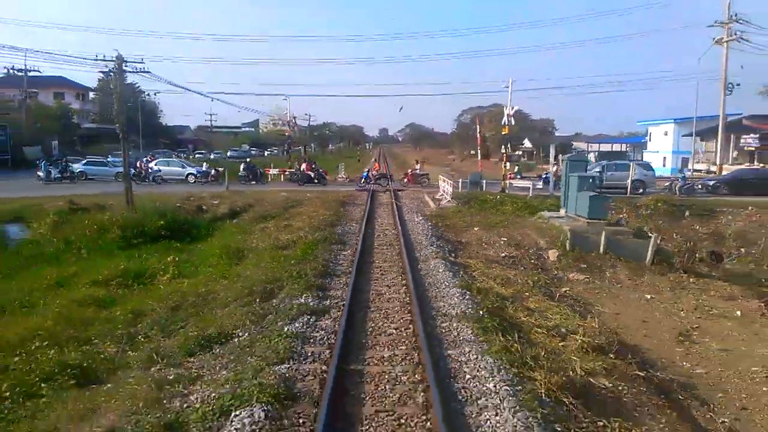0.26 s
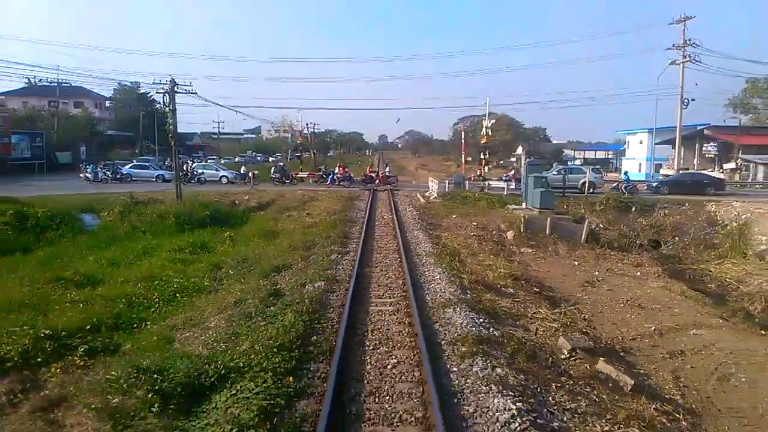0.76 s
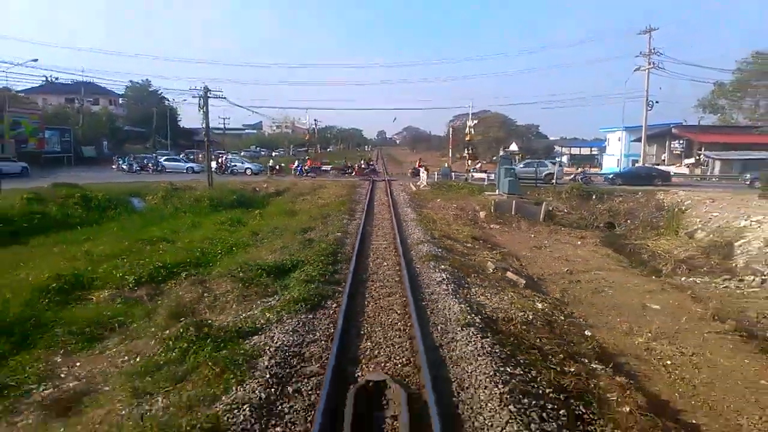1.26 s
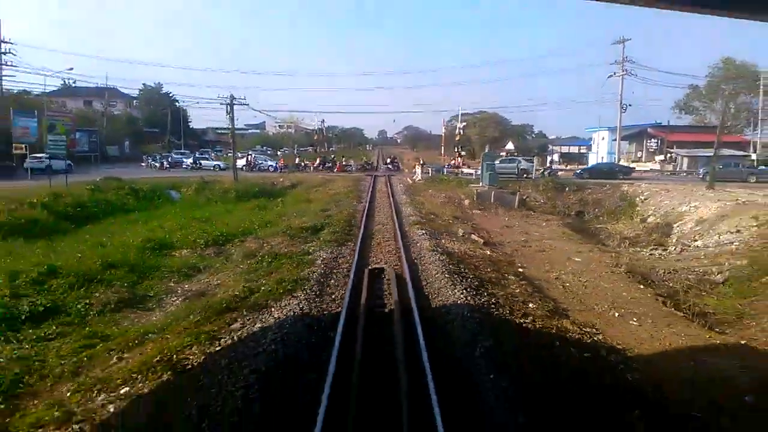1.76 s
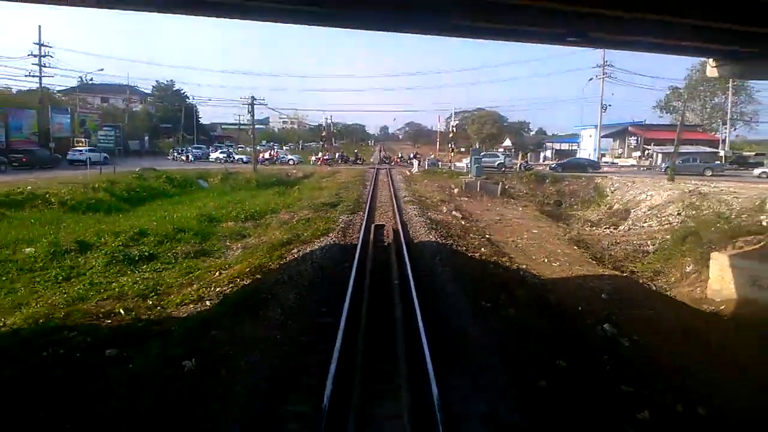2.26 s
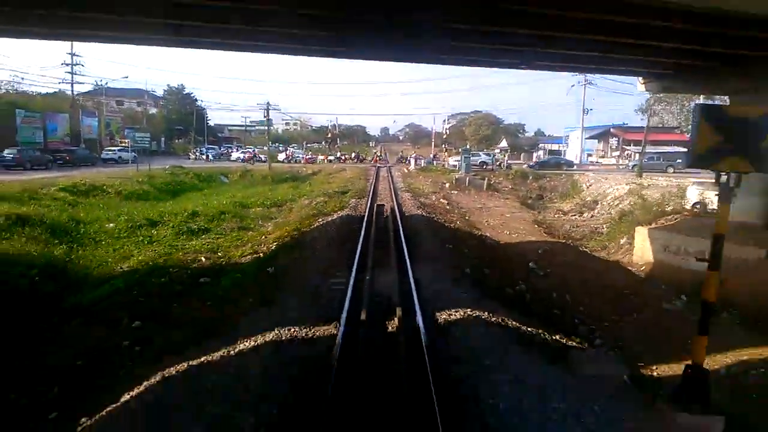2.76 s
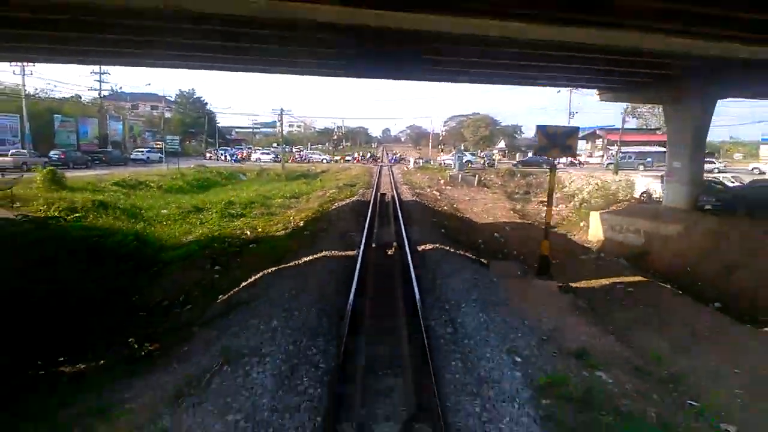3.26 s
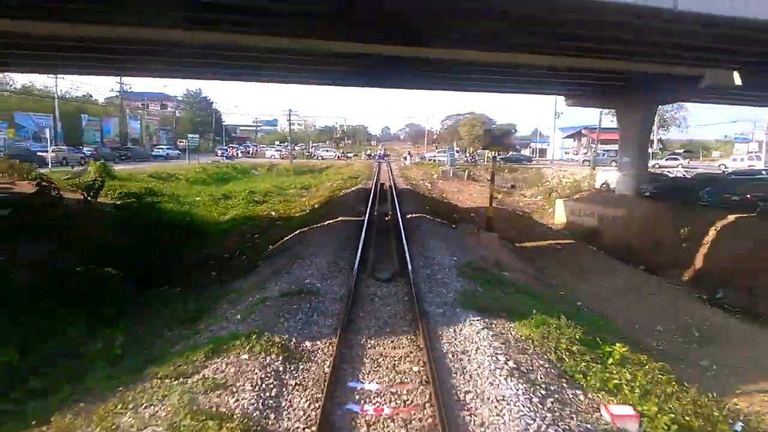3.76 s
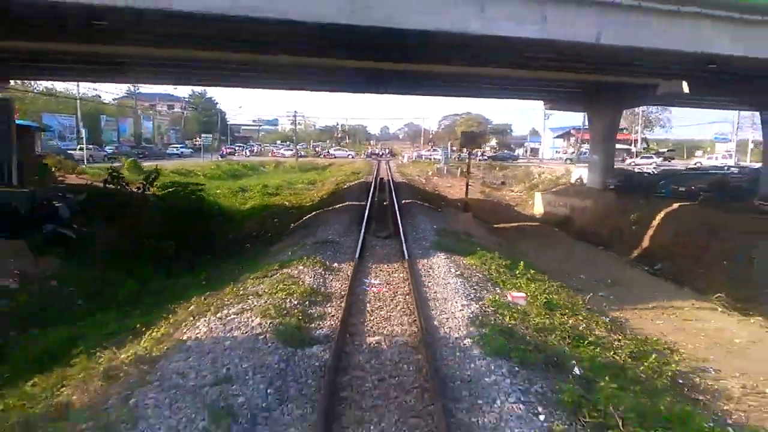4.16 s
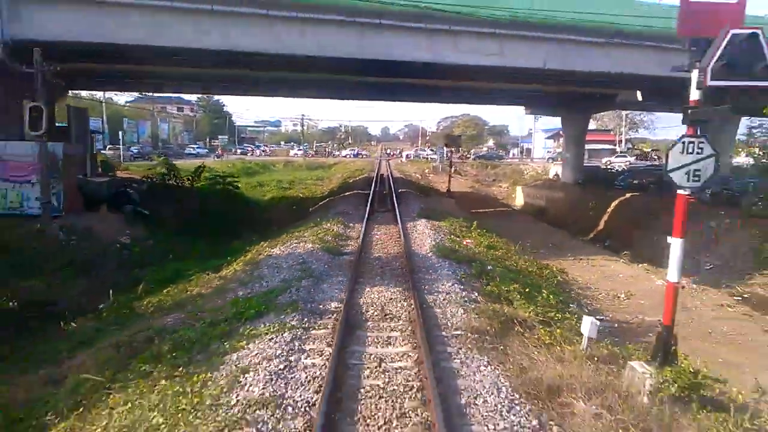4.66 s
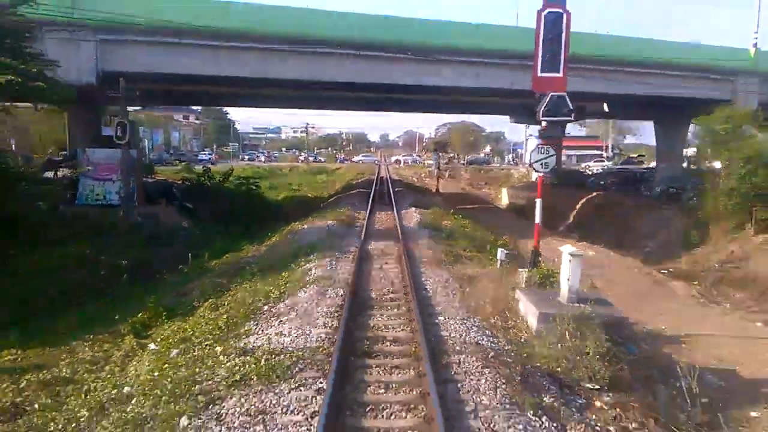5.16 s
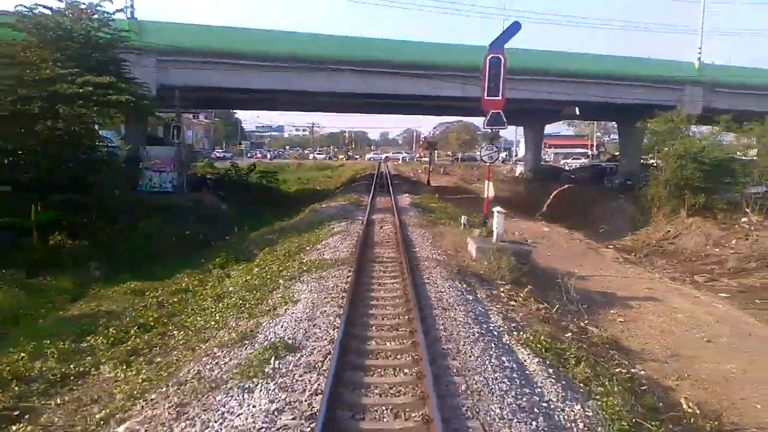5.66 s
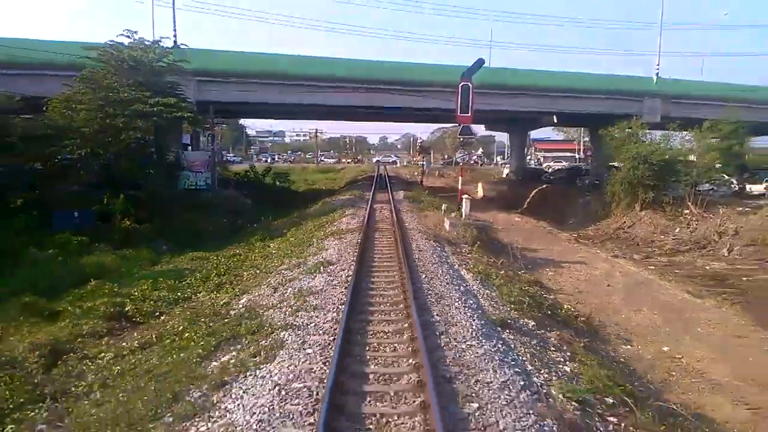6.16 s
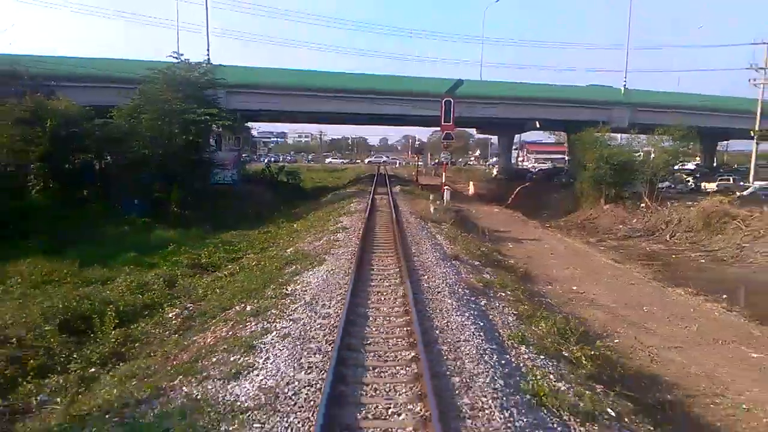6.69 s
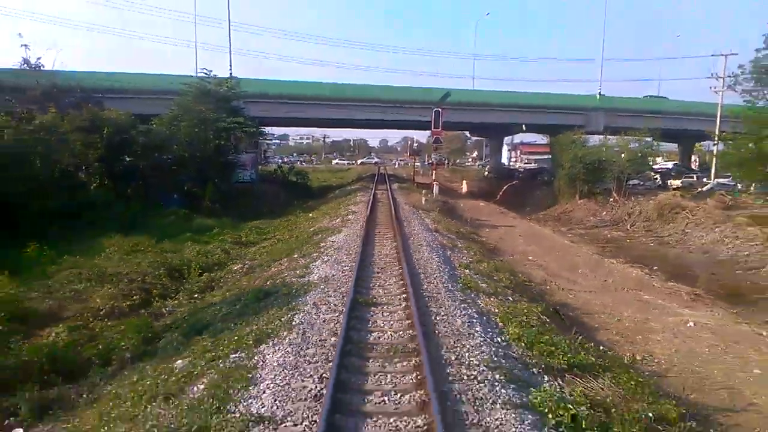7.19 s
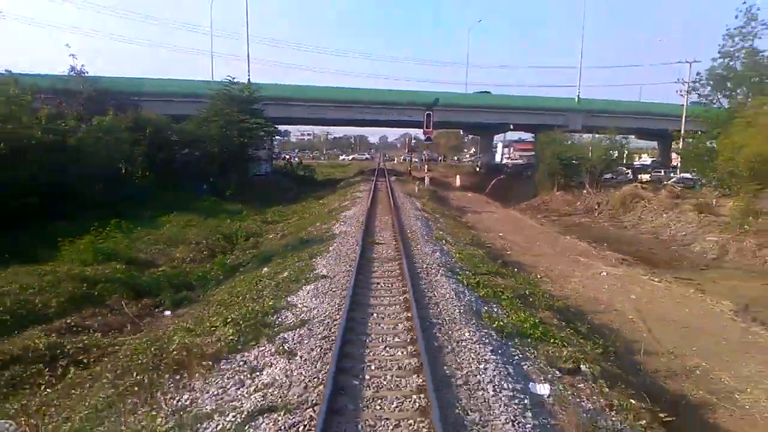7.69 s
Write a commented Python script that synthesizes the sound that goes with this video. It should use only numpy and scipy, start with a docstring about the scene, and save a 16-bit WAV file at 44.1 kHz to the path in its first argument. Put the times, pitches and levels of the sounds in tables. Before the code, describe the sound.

Heard from the open rear of a moving train: low booming floor, groans swelling with each wheel turn, brief squeaks, thuds and loose iron clatter.

```python
"""The open rear end of a passenger carriage rolling on a single track at a nearly steady, slightly rising speed.
Throughout, filtered noise makes body boom, rail rumble, wheel ring and hiss, swelling with each turn of a worn wheel;
floor groans, squeaks and cracking grit recur. Dry ticks come first, a thin squeal at 0.6 s, then scraping flanges.
Jolts shake the bogie near 1.6 and 3.9 s; loose iron clanks near 1.5, 3.5, 4 and 6 s. Panels knock and the floor
thuds from 1.3 s on, and small fittings chink from 3.4 s. Strikes are short noise bands or swinging tones."""
import sys
import numpy as np
from scipy import signal
from scipy.fft import rfft, irfft, next_fast_len
from scipy.io import wavfile
from scipy.ndimage import uniform_filter1d

SR = 44100
rng = np.random.default_rng(int(sys.argv[2]) if len(sys.argv) > 2 else 0)


def unload_audio(sound):
    """Save the sound as a 16-bit wav file, at the path given as the first command line argument."""
    columns = np.transpose(np.atleast_2d(sound))
    # keep every value between -1 and 1, then stretch to whole-number steps
    steps = np.round(np.clip(columns, -1, 1) * 32767)
    wavfile.write(sys.argv[1], SR, steps.astype(np.int16))


N = 349696
TAPS = 16384  # filter length [samples]
TIME = np.arange(N) / SR
HZ = np.maximum(np.fft.rfftfreq(TAPS, 1 / SR), 1)
TURN_HZ = 4.7474  # initial wheel turns per second

# rolling noise over rougher and smoother rail: (time [s], floor rumble [dB], panel roar [dB])
TRACK_LEVELS = [(0.0, -40, -48), (0.65, -36.5, -45.5), (0.92, -34, -44), (1.97, -32, -43.5),
                (2.2, -34, -46.5), (2.85, -35.5, -45.5), (3.0, -35.5, -47), (3.15, -38.5, -48.5),
                (3.55, -35, -48.5), (3.7, -39.5, -48.5), (3.9, -33.5, -41), (4.2, -38.5, -52),
                (4.5, -34.5, -52), (4.75, -45, -50), (6.0, -37.5, -49.5), (6.4, -42, -52),
                (7.35, -40.5, -51.5), (7.7, -36.5, -45.5)]
# steel rubbing on steel: (time [s], wheel ring [dB], scrape [dB], hiss [dB])
RUB_LEVELS = [(0.0, -53.5, -60, -63.5), (0.75, -52.5, -57.5, -62), (0.95, -54, -48, -60.5),
              (1.3, -54.5, -49, -60.5), (1.45, -53, -45.5, -60), (1.7, -54, -57, -60.5),
              (2.9, -55.5, -52, -62.5), (3.05, -55.5, -60, -63.5), (3.8, -56, -69, -62),
              (3.95, -54, -55, -62), (4.2, -54.5, -60, -64.5), (4.52, -58.5, -61, -62.5),
              (4.7, -58.5, -66.5, -67), (4.95, -55.5, -61.5, -66.5), (7.35, -56.5, -63.5, -66.5),
              (7.93, -52.5, -63, -64)]


def undb(db):
    """Decibels to gain."""
    return 10 ** (np.asarray(db) / 20)


def pan(db):
    """Gains of the two channels for a left minus right level."""
    return undb(np.array([[db], [-db]]) / 2)


def curves(table):
    """Each column of a table, joined by straight lines in time."""
    s, *columns = np.transpose(table)
    return [np.interp(TIME, s, column) for column in columns]


def across(points, hz=HZ):
    """(Hz, value) points joined on a log-frequency axis."""
    f, value = np.transpose(points)
    return np.interp(np.log(hz), np.log(f), value)


def resonances(modes):
    """Gain per channel and frequency of steep-sided resonances, summed in power."""
    power = 0
    for hz, width_hz, db, lean_db in modes:
        peak = undb(db) * pan(lean_db)
        power = power + (peak / (1 + (2 * (HZ - hz) / width_hz) ** 2)) ** 2
    return np.sqrt(power)


def ring(x, gain):
    """Play x through the causal (minimum-phase) filter with this gain curve; white noise keeps its power."""
    cepstrum = irfft(np.log(np.atleast_2d(gain) + 1e-9))
    # fold the cepstrum onto positive time
    cepstrum[:, 1:TAPS // 2] *= 2
    cepstrum[:, TAPS // 2 + 1:] = 0
    response = irfft(np.exp(rfft(cepstrum)))
    power = np.sum(response ** 2) / len(response)
    return signal.oaconvolve(x, response / np.sqrt(power), axes=1)[:, :N]


def noise():
    """White noise at two ears: alike in the bass, mostly unlike in the treble."""
    # likeness of the two ears: (frequency [Hz], correlation [-1 to 1])
    likeness = [(70, 0.98), (150, 0.92), (330, 0.95), (450, 0.64), (580, 0.58), (680, 0.77), (850, 0.79),
                (1050, -0.034), (1800, 0.053), (2250, -0.65), (3100, 0.33), (4600, -0.33), (6000, 0.14),
                (8000, 0.0022)]
    size = next_fast_len(N)
    hz = np.maximum(np.fft.rfftfreq(size, 1 / SR), 1)
    alike = np.clip(across(likeness, hz), -1, 1)
    shares = np.sqrt([(1 + alike) / 2, (1 - alike) / 2])
    mid, side = rfft(rng.standard_normal((2, size))) * shares
    return irfft(np.array([mid + side, mid - side]), size)[:, :N]


def walk(rate_hz):
    """Random levels held 1 / rate_hz seconds and slewed; standard deviation 1."""
    k = max(int(SR / rate_hz), 1)
    held = np.repeat(rng.standard_normal(N // k + 1), k)
    y = uniform_filter1d(held, k)[:N]
    return y / y.std()


def steady(x, span_s):
    """Even out the chance swells of a narrow noise that last longer than span_s."""
    k = max(int(span_s * SR), 1)
    power = uniform_filter1d(uniform_filter1d(np.mean(x ** 2, axis=0), k), k)
    return x / np.sqrt(power + 1e-12)


def burst(s, rise_s, hold_s, t60_s):
    """Envelope that rises from s, starts to die hold_s after s and then falls 60 dB per t60_s."""
    out = np.zeros(N)
    live = slice(*np.searchsorted(TIME, [s, s + hold_s + 2 * t60_s]))
    age = TIME[live] - s
    decay = np.exp(-np.log(1000) * np.maximum(age - hold_s, 0) / t60_s)
    out[live] = np.clip(age / rise_s, 0, 1) * decay
    return out


def band(force, hz, width_hz):
    """Narrow noise around a pitch that may move, as strong as the force that drives it."""
    out, live = np.zeros(N), force > 0
    low = signal.butter(2, np.clip(width_hz / 2, 2, 5000), fs=SR, output="sos")
    own_rng = np.random.default_rng(rng.integers(2 ** 31))
    chance = own_rng.standard_normal((live.sum(), 2)).T
    a, b = steady(signal.sosfilt(low, chance), span_s=1.3 / width_hz)
    angle = 2 * np.pi * np.cumsum(np.broadcast_to(hz, N)[live]) / SR
    out[live] = force[live] * (a * np.cos(angle) + b * np.sin(angle))
    return out


def ripple(depth_db, spacing_hz):
    """Random narrow peaks and dips per ear, as echoes from close walls give."""
    knots = np.arange(0, SR / 2, spacing_hz)
    heights = rng.standard_normal((2, 4096))[:, :len(knots)]
    return undb(depth_db * np.array([np.interp(HZ, knots, row) for row in heights]))


def wheel_swell(lag_s):
    """Contact force over each turn of the worn wheel, about -1 to 1; the train gains a little speed."""
    first_turn_s, gain_hz_per_s = 0.0786, 0.0185  # worn patch first meets the rail; growth of turn rate
    dip_sharpness = 0.067  # share of second harmonic: dips narrower than swells
    age = TIME - lag_s - first_turn_s
    angle = 2 * np.pi * (TURN_HZ * age + .5 * gain_hz_per_s * age ** 2)
    return np.cos(angle) - dip_sharpness * np.cos(2 * angle)


def fittings():
    """Dry ticks to the left and thin chinks of a small loose metal part: short bursts of resonant noise."""
    # light dry ticks: (time [s], level before a 10 dB cut [dB])
    tick_table = [(0.2064, -46), (.335, -47), (0.423, -46), (5.895, -45)]
    # metal chinks: (time [s], level [dB])
    chink_table = [(3.425, -77), (3.655, -73), (3.85, -68), (4.34, -71), (4.5, -64), (5.51, -69),
                   (6.16, -59), (7.078, -67.5), (7.345, -83)]
    ticks = sum(undb(db - 10.0) * burst(s, rise_s=.0003, hold_s=0.00091, t60_s=.006) for s, db in tick_table)
    chinks = sum(undb(db) * burst(s, rise_s=.004, hold_s=0.011, t60_s=.15) for s, db in chink_table)
    # modes: (frequency [Hz], width [Hz], level [dB], left minus right [dB])
    tick_modes = [(8500, 6000, -2, 16), (11200, 5000, 0, 8.7)]
    chink_modes = [(6100, 1300, 0, 0), (8600, 2500, -5, 0), (12100, 1100, -4, 0)]
    return ring(noise() * ticks, resonances(tick_modes)) + ring(noise() * chinks, resonances(chink_modes))


def squeal():
    """The left-hand wheel sings one thin note that creeps in and flutters."""
    level_db, flutter_db, pitch_hz, waver_hz = -62.5, 2.5, 2940, 8
    tone = np.sin(2 * np.pi * np.cumsum(pitch_hz + waver_hz * walk(60)) / SR)
    swell = burst(0.62, rise_s=.06, hold_s=0.12, t60_s=.35)
    return undb(level_db + flutter_db * walk(50)) * swell * tone * pan(8.2)


def squeaks():
    """The right-hand wheel's flange rubs the rail: narrow to broad noise, rough with stick and slip, sags in pitch."""
    # rubs: (time [s], level before a 3.5 dB cut [dB], hold [s], mid pitch [Hz], width [Hz])
    rubs = [(0.42, -49.5, .029, 1965, 70), (2.141, -54, 0.055, 1932, 199.7),
            (2.392, -55, 0.09, 1750, 899.6), (2.772, -55, .025, 1680, 249),
            (3.194, -52.5, 0.038, 1970, 130), (3.445, -48, .024, 1954, 160.2),
            (4.303, -56, .027, 1940, 180), (5.451, -52.5, .045, 1983, 240.4),
            (5.684, -55, 0.071, 1751, 299.1), (5.872, -53, .025, 1975, 140),
            (6.336, -59, 0.016, 1985, 159.6), (6.69, -54, .04, 1927, 500), (6.912, -49.5, 0.028, 1970, 130),
            (7.095, -54.5, 0.044, 1650, 300), (7.126, -57, 0.031, 2480, 349.6),
            (7.35, -57, 0.024, 2620, 300), (7.51, -50, 0.042, 1954, 151), (7.52, -56, 0.056, 1700, 350),
            (7.54, -58, .11, 2520, 398.6)]
    sag_hz_per_s, rough_db = 300, 2
    out = 0
    for s, db, hold_s, hz, width_hz in rubs:
        pitch_hz = hz - sag_hz_per_s * (np.clip(TIME - s, 0, 2 * hold_s) - hold_s / 2)
        force = undb(db) * burst(s, rise_s=0.02, hold_s=hold_s, t60_s=0.09)
        out = out + band(force, pitch_hz, width_hz)
    return out * undb(rough_db * walk(160) - 3.5) * pan(-11.5)


def clanks(walls):
    """Iron chatters against iron for a moment; the struck part clangs at its own pitch and rings on."""
    # strikes: (time [s], level before fixed cuts [dB], rattle [s], tail t60 / 2.26 [s],
    #           brightness [dB per octave], pitch [Hz], ring re level [dB], clang [dB])
    strikes = [(1.511, -39, 0.0097, 0.37, -1.7, 1781, -10, -47),
               (3.519, -52, 0.044, 0.48, -0.3, 3750, -20, -66),
               (4.012, -48.5, 0.072, 0.24, -2.5, 2000, -1, -49),
               (5.927, -37, 0.0036, 0.33, 0.2, 2694, -9, -50),
               (5.941, -40.5, 0.0031, 0.29, 0.5, 2895, -12, -46),
               (5.972, -52, 0.014, 0.43, -2, 3170, -8, -54),
               (6.159, -42.5, 0.016, 0.3, 0.5, 1264, -4, -44.5)]
    # colour: (frequency [Hz], level [dB])
    clank_colour = [(200, -2.5), (760, 3.5), (1050, 6), (1400, 4.5), (2100, 1), (2900, 0), (4000, -2),
                    (5200, -9.5), (8800, -10.5), (11000, -14), (12500, -24), (14000, -20)]
    # ironwork modes: (frequency [Hz], width [Hz], level [dB], left minus right [dB])
    iron_modes = [(727, 45, 0, 0), (849, 50, -2, 1), (1156, 81, -1, -3), (1270, 130, -1, 1),
                  (1390, 110, -3, 2), (1776, 120, 1, -2), (1880, 120, 0, -13), (2020, 110, -11, -7),
                  (2490, 170, -2.5, -5), (2940, 260, -8, -7), (3180, 220, -3, -3), (3740, 280, -7.5, 3)]
    focus_db = 19.5  # ring loss per octave away from the strike's pitch
    out = 0
    chatter = noise() * undb(2.5 * walk(300) - .6)
    iron = resonances(iron_modes)
    for s, db, rattle_s, t60_s, bright_db, hz, ring_db, clang_db in strikes:
        blow = burst(s, rise_s=.001, hold_s=rattle_s, t60_s=.08)
        tail = burst(s, rise_s=0.005, hold_s=rattle_s, t60_s=2.26 * t60_s)
        colour = undb(across(clank_colour) + bright_db * np.log2(HZ / 3000)) * walls
        rings = iron * undb(-focus_db * np.abs(np.log2(HZ / hz)))
        out = out + ring(chatter * (blow + .5 * tail) * undb(db - 5.5), colour)
        out = out + ring(chatter * (blow + .6 * tail) * undb(db + ring_db - 3), rings)
        clang = band(burst(s, rise_s=.004, hold_s=rattle_s, t60_s=0.1), hz, width_hz=350)
        out = out + undb(clang_db) * clang * pan(-8)
    return out * pan(0.96)


def thuds():
    """A few heavy sine swings of the floor after a shove from the springs."""
    # shoves: (time [s], level [dB], pitch [Hz])
    shoves = [(1.525, -24, 58), (1.58, -25, 47.94), (2.425, -24, 57.6), (3.645, -24, 58),
              (4.329, -24.5, 66.4), (4.489, -23.5, 65.66), (5.345, -28, 56.04), (5.945, -23, 52.02),
              (6.181, -30, 53), (6.905, -28, 66), (7.005, -22, 51.85), (7.079, -25.5, 46.7),
              (7.315, -27, 54.97)]
    out = 0
    for s, db, hz in shoves:
        swing = np.sin(2 * np.pi * hz * (TIME - s))
        out = out + undb(db) * burst(s, rise_s=0.013, hold_s=0.033, t60_s=0.17) * swing
    return out


def knocks():
    """A floor or bogie panel takes a hard blow and shudders briefly in a narrow band."""
    # blows: (time [s], level [dB], hold [s], pitch [Hz])
    blows = [(1.344, -41, .025, 780), (1.757, -32.5, 0.028, 677), (2.165, -35.5, .03, 193),
             (2.391, -43.5, 0.028, 861), (2.6, -41.5, .03, 670.5), (2.79, -43, .03, 543),
             (3.345, -36, 0.021, 180), (3.63, -41, 0.038, 543), (4.002, -37.5, 0.022, 791),
             (4.327, -35, .035, 165.3), (4.43, -42, 0.05, 479), (4.487, -33, .04, 202.9),
             (5.18, -49, .035, 740), (5.68, -46, .03, 485.3), (5.928, -36, 0.046, 184),
             (6.189, -47, 0.025, 725.6), (6.517, -38, .025, 210), (6.7, -45.5, 0.039, 763),
             (6.91, -41, 0.018, 392), (7.131, -36.5, 0.021, 384.5), (7.72, -44.5, .03, 752),
             (7.755, -37.5, 0.032, 195)]
    out = 0
    for s, db, hold_s, hz in blows:
        force = undb(db) * burst(s, rise_s=0.0045, hold_s=hold_s, t60_s=0.11)
        out = out + band(force, hz, width_hz=0.23 * hz)
    return out


def jolts(walls):
    """The wheels batter over a bump and shake the whole bogie: coloured noise, unevenly strong."""
    # bumps: (time [s], level [dB], rise [s], hold [s], brightness [dB per octave])
    bumps = [(1.519, -35.5, 0.004, 0.03, -.5), (1.731, -32.5, 0.014, 0.11, 0.5),
             (3.778, -34.5, .012, 0.039, -2.5), (3.832, -32.5, 0.015, 0.061, 0.5),
             (3.997, -27.5, 0.007, 0.031, -.5), (4.041, -32.5, .006, 0.036, 1.5)]
    # colour: (frequency [Hz], level [dB])
    jolt_colour = [(90, -10), (200, 0), (300, 5.5), (400, 7), (520, -9), (740, -5.5), (1100, -10.5),
                   (1500, -23.5), (1950, -20), (2500, -25), (3200, -35.5), (4500, -37), (9000, -46),
                   (14000, -59)]
    out = 0
    # ringing wheel on the right: (frequency [Hz], left minus right [dB])
    lean_db = across([(700, 1.5), (1300, -5.0), (2000, -8.0), (2600, -6), (4000, 2.5)])
    colour = undb(across(jolt_colour) + np.array([[1], [-1]]) * lean_db / 2) * walls
    batter = noise() * undb(3.5 * walk(160))
    for s, db, rise_s, hold_s, bright_db in bumps:
        tilt = undb(bright_db * np.log2(np.minimum(HZ, 2000) / 400))
        shake = steady(ring(batter, colour * tilt), span_s=0.0081)
        out = out + shake * undb(db) * burst(s, rise_s, hold_s, t60_s=0.29)
    return out


def grit():
    """Grit crushed under the treads: decaying sine grains, louder as a turn presses or the flanges scrape."""
    grains_per_s, cycles_per_grain = 130, 8.2
    grit_db, scrape_weight_db, spread_db = -4, 4, 3.5  # re panel roar; scrape re roar; spread of sizes
    low_hz, high_hz, tilt_db_per_octave = 654, 3000, -6
    out = np.zeros((2, N))
    grinding_db = np.maximum(curves(TRACK_LEVELS)[1], curves(RUB_LEVELS)[1] + scrape_weight_db)
    level_db = grinding_db + grit_db + 2.1 * wheel_swell(lag_s=.014)
    for when, pitch, size, side in rng.random((int(grains_per_s * N / SR), 4)):
        i = int(when * N)
        hz = low_hz * (high_hz / low_hz) ** pitch
        length = min(int(2 * cycles_per_grain * SR / hz), N - i)
        cycles = hz * TIME[:length]
        size_db = -spread_db * np.log(max(size, .03))
        db = level_db[i] + size_db + tilt_db_per_octave * np.log2(hz / low_hz)
        grain = np.sin(2 * np.pi * cycles) * undb(-30 * cycles / cycles_per_grain)
        out[:, i:i + len(grain)] += undb(db) * grain * pan(16 * (side - .6))
    return out


def rubbing(walls):
    """Steel slides on steel: the wheels ring, the flanges scrape and hiss, as resonant or coloured noise."""
    # wheel and flange modes: (frequency [Hz], width [Hz], level [dB], left minus right [dB])
    ring_modes = [(1752, 204, 1.5, -7), (1973, 125, 7, -7.5), (2110, 560, -5, -5), (2483, 330, 3, -5.5),
                  (2560, 430, -8, 3.5)]
    scrape_modes = [(1077, 330, 2.5, -0.5), (1510, 580, -1, -1.5), (1760, 390, -7.5, -3.5),
                    (2360, 910, -9.5, -2.5)]
    # hiss colour: (frequency [Hz], level [dB])
    hiss_colour = [(500, -28), (1200, 6), (2500, 7), (3200, 6.5), (4000, 4.5), (4700, 0), (6000, 0.5),
                   (6600, -3), (8600, -1.5), (10500, -7.5), (12000, -11.5), (14500, -19.5)]
    # hiss balance: (frequency [Hz], left minus right [dB])
    hiss_lean = [(2800, -0.5), (4500, 3), (6200, 0), (8000, 6.5), (10500, 2.5), (12000, 1)]
    ring_db, scrape_db, hiss_db = curves(RUB_LEVELS)
    swell = wheel_swell(lag_s=0.014)
    wheel_force = noise() * undb(ring_db + 1.3 * swell + 1.8 * walk(30))
    wheels = ring(wheel_force, resonances(ring_modes) * walls)
    scrape_force = noise() * undb(scrape_db + 2.0 * swell + 2.7 * walk(60))
    scrape = ring(scrape_force, resonances(scrape_modes) * walls)
    lean = undb(np.array([[1], [-1]]) / 2 * across(hiss_lean))
    hiss_force = noise() * undb(hiss_db + 1.77 * swell + 1.3 * walk(40))
    hiss = ring(hiss_force, undb(across(hiss_colour)) * lean * walls)
    return wheels + scrape + hiss


def surges():
    """The wheel bites on rippled rail and the floor groans in a narrow band that sags in pitch."""
    # rippled patches: (time [s], level [dB], hold [s], mid pitch [Hz])
    patches = [(0.021, -36, 0.048, 291), (0.444, -39, 0.085, 302), (0.856, -32, .11, 285),
               (1.09, -30.5, .11, 280), (1.284, -36, .15, 305), (1.516, -29, 0.087, 299.6),
               (1.656, -31, 0.19, 301.4), (1.921, -28, 0.15, 304), (2.107, -30.5, 0.099, 261.5),
               (2.325, -34.5, 0.098, 305), (2.528, -33, 0.091, 293.7), (2.949, -29, .11, 294.5),
               (3.535, -31.5, 0.061, 280), (3.836, -29.5, 0.045, 315), (3.992, -31.5, 0.11, 305),
               (4.238, -32.5, .055, 319.6), (4.408, -34, 0.089, 319), (4.834, -37, 0.055, 359.4),
               (5.069, -38, 0.051, 321.3), (5.201, -41, .05, 279), (5.443, -34, 0.1106, 308),
               (5.634, -35.5, 0.13, 297.7), (5.85, -36.5, 0.077, 310), (6.059, -34, .075, 314),
               (6.195, -36, 0.039, 312), (6.29, -40, .045, 322), (6.457, -37, .08, 262),
               (6.661, -39.5, .09, 300.3), (7.117, -34.5, 0.039, 315.5), (7.361, -37.5, .06, 312),
               (7.684, -32.5, .13, 285)]
    sag_hz_per_s = 260
    starts, _, holds, pitches = np.transpose(patches)
    latest = np.maximum(np.searchsorted(starts, TIME) - 1, 0)
    from_middle_s = np.clip(TIME - (starts + holds / 2)[latest], -.1, .1)
    force = sum(undb(db) * burst(s, rise_s=0.0084, hold_s=hold_s, t60_s=.16) for s, db, hold_s, _ in patches)
    return band(force, pitches[latest] - sag_hz_per_s * from_middle_s, width_hz=47.3) * pan(-.6)


def bounce():
    """How hard the body moves on its springs: a restless sway and louder heaves, added in power."""
    # heaves: (time [s], level [dB], hold [s])
    heave_table = [(0.0, -30.5, 0.2), (0.281, -30.5, 0.4), (0.784, -27, 0.048), (1.388, -32.5, 0.29),
                   (1.832, -30.5, 0.09), (2.052, -35.5, .19), (2.424, -30.5, 0.048), (2.686, -29, 0.13),
                   (3.08, -30, 0.11), (3.326, -29.5, 0.39), (3.793, -28.5, 0.079), (3.985, -25, 0.026),
                   (5.043, -32, 0.15), (5.32, -35.5, 0.16), (6.706, -29, 0.069), (6.99, -32, 0.36),
                   (7.685, -29, 0.092)]
    boom_db, drift_db_per_s, sway_db = -34, -0.19, 2.0
    sway = undb(boom_db + drift_db_per_s * TIME + sway_db * walk(12))
    heaves = sum(undb(db) * burst(s, rise_s=0.015, hold_s=hold_s, t60_s=0.3) for s, db, hold_s in heave_table)
    return np.hypot(sway, heaves)


def body():
    """The carriage body booms in its lowest resonances around a wavering drone; a floor panel hums on."""
    # body modes: (frequency [Hz], width [Hz], level [dB], left minus right [dB])
    body_modes = [(51.4, 8.2, 1.5, -1), (63.1, 32.4, -1.5, 0.5), (74.3, 6.1, -1, -1),
                  (98.5, 61, -17.5, -0.5), (136, 70, -26, 3)]
    hum_modes = [(205.85, 9.8, 1.5, 0), (185.5, 18.8, -7.0, 0.0067)]
    drone = np.sin(2 * np.pi * np.cumsum(75.3 + 0.674 * walk(3.166)) / SR)
    boom = ring(noise(), resonances(body_modes)) + undb(-3.5) * drone
    hum = steady(ring(noise(), resonances(hum_modes)), span_s=0.25)
    hum_level = undb(-47.5 + 2.8 * wheel_swell(lag_s=0.0042))
    return steady(boom, span_s=0.063) * bounce() + hum * hum_level


def rolling():
    """Rail roughness drives the resonances of floor and panels, harder once a turn."""
    # floor and panel modes: (frequency [Hz], width [Hz], level [dB], left minus right [dB])
    floor_modes = [(176.6, 28, -13, -1), (207.8, 9.4, -1, -1), (233, 74, -9, 0.16), (272, 24.3, 0.5, -2),
                   (306.4, 37, -2, 0), (319.9, 19.5, 0.5, -0.27), (345, 104, -9.5, -1),
                   (389.2, 17.3, -0.5, 1.3), (422.8, 30.5, -2.5, 0), (457.6, 14.5, -2.5, 2.2)]
    panel_modes = [(507, 71, -1.5, 3), (543.4, 34, 2.5, -2.5), (585, 35, 1.5, -1), (590, 43, -12.5, 1),
                   (673.4, 32, 3.5, 11.5), (708, 27, -2, -14), (765.5, 39, 1.5, -1), (796, 155, 0.5, -3.5),
                   (869, 12.5, 0, 7.5), (904, 52, -5, -8), (985, 23, -0.5, 2), (1090, 186, -18.5, -4.5)]
    turn_scatter_db = 1.17  # chance level, redrawn at about the turn rate
    rumble_db, roar_db = curves(TRACK_LEVELS) + turn_scatter_db * walk(TURN_HZ)
    floor = steady(ring(noise(), resonances(floor_modes)), span_s=.06) * undb(1.2 * walk(30))
    rumble = floor * undb(rumble_db + 3.46 * wheel_swell(lag_s=-0.0035) - 0.78)
    shaking_db = roar_db + 2.3 * wheel_swell(lag_s=0.013) + 2.07 * walk(45) + 0.08
    roar = ring(noise() * undb(shaking_db), resonances(panel_modes))
    return rumble + roar


def scene():
    """Everything heard from the rear platform."""
    walls = ripple(depth_db=2.5, spacing_hz=39.91)
    running = body() + rolling() + surges() + grit() + rubbing(walls) + squeaks() + squeal()
    return running + jolts(walls) + knocks() + clanks(walls) + thuds() + fittings()


def record(dry):
    """The deepest bass below about 30 Hz is taken away and the recorder cuts the top."""
    high_pass = signal.butter(3, 30, "high", fs=SR, output="sos")
    thinned = signal.sosfiltfilt(high_pass, dry)
    top_cut = signal.ellip(10, .2, 80, 14300, fs=SR, output="sos")  # 0.2 dB ripple, 80 dB stop, 14.3 kHz
    return signal.sosfilt(top_cut, thinned)


dry = scene()
out = record(dry)
unload_audio(out)
```